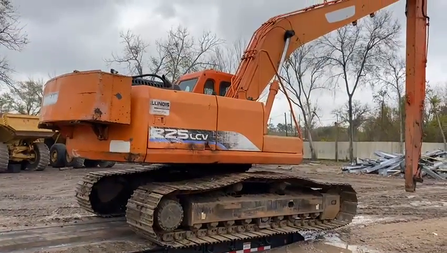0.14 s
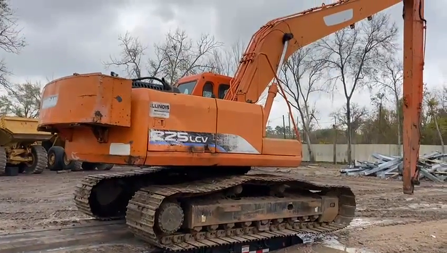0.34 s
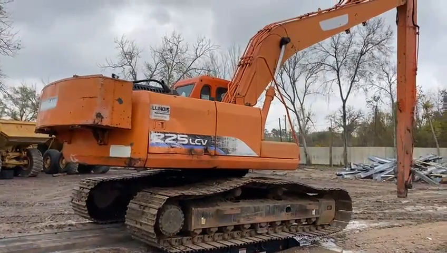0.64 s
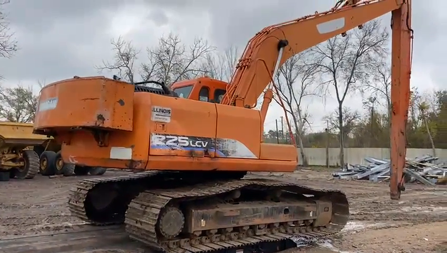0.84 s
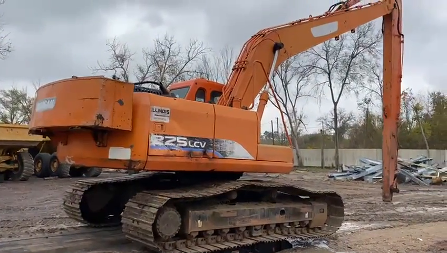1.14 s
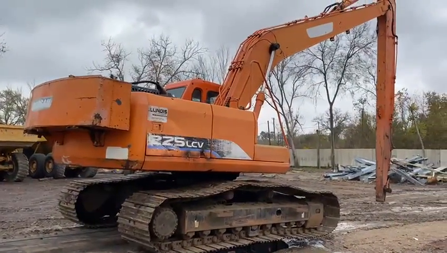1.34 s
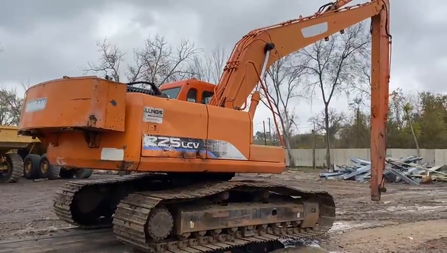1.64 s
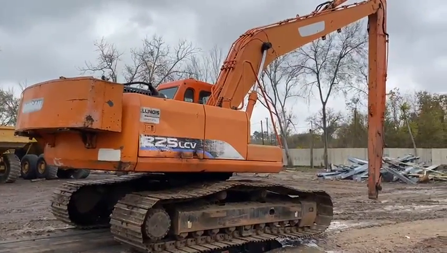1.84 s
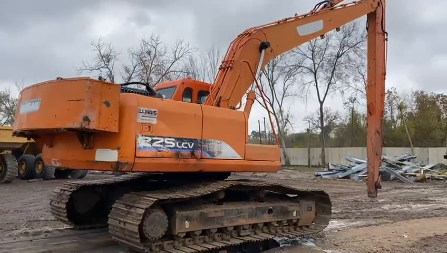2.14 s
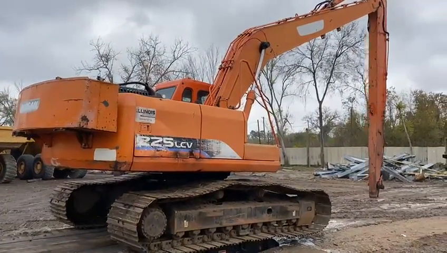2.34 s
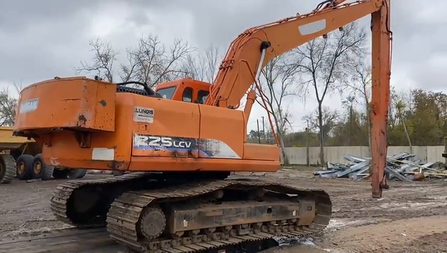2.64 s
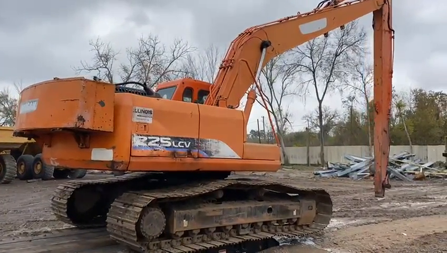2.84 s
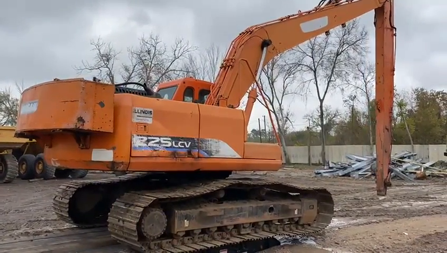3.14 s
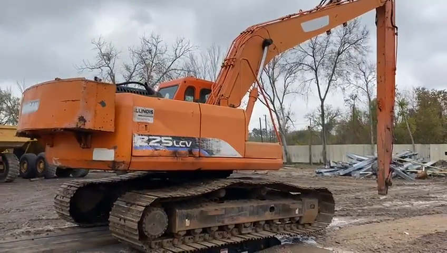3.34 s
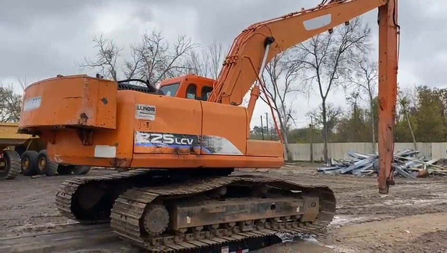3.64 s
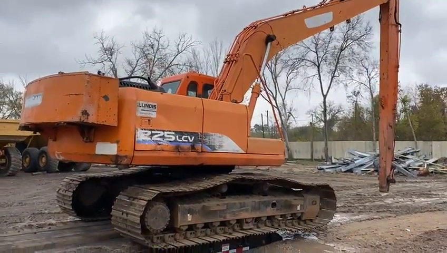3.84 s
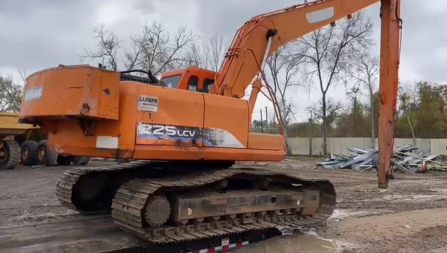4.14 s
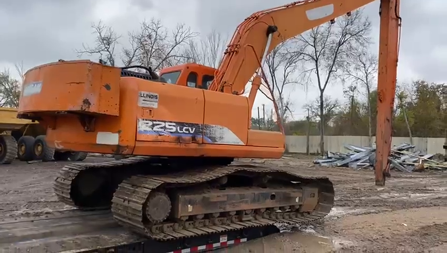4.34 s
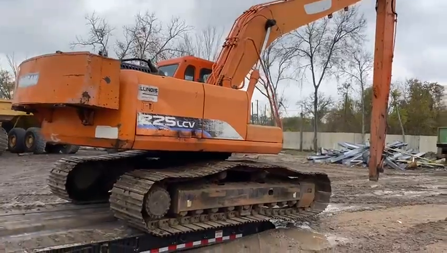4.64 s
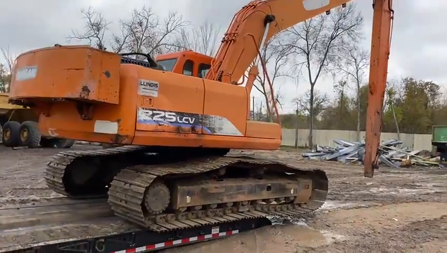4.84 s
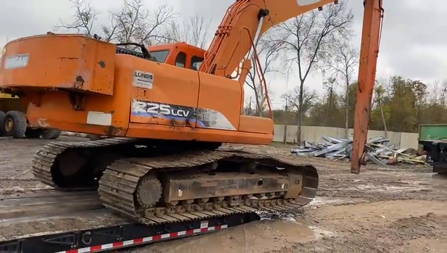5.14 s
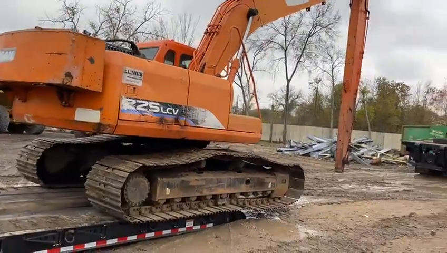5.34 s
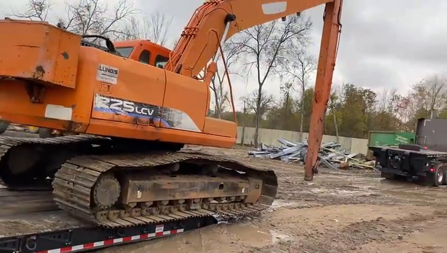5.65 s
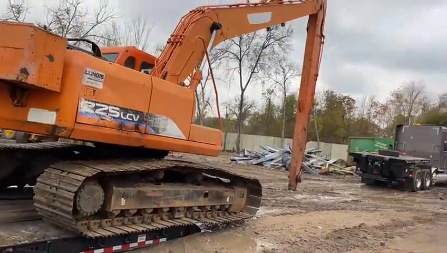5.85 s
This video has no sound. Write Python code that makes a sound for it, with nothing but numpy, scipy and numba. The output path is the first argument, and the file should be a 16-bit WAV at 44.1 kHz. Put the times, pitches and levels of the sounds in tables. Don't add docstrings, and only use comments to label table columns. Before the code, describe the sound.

In an open yard, a diesel excavator drones with a throbbing exhaust and fan roar, a truck idling low beneath it. Early on, steel track shoes clank in a loud cluster, booming through a trailer. A thin roller squeal follows, then one sharp clank. After a calmer stretch, looser clanks and scrapes return as the engine works harder. Stereo, heard from some metres away.

```python
import sys
import numpy as np
from numba import njit
from scipy import signal
from scipy.fft import rfft, irfft, next_fast_len
from scipy.io import wavfile
from scipy.ndimage import uniform_filter1d, minimum_filter1d

SR = 44100
rng = np.random.default_rng(int(sys.argv[2]) if len(sys.argv) > 2 else 0)


def put_to_file(sound):
    columns = np.atleast_2d(sound).T
    safe = np.clip(columns, -1, 1)
    whole_steps = np.round(safe * 32767)
    wavfile.write(sys.argv[1], SR, whole_steps.astype(np.int16))


def level_to_linear(level):
    exponent = np.asarray(level, float) / 20
    return 10 ** exponent


N = 265021
T = np.arange(N) / SR
START_TURN = 0.3034

# f/Hz, level/dB, wander/Hz
TRUCK_TONES = [(40.5, -64, 0.37), (62.95, -34.5, 1.45), (79.9, -36, 0.557)]
# multiple of shaft rate, level/dB
ENGINE_ORDERS = [(2, -64), (3, -39), (4, -33), (4.5, -43), (5, -30), (5.5, -45), (6, -42), (7, -49),
                 (8, -40.5), (9, -58), (11, -42.5), (12, -35), (13, -41.5), (14, -67), (15, -47.5),
                 (16, -50), (17, -49.5), (19, -54.5), (24, -46.5)]
# t/s, shaft rate/(turns per s)
SHAFT_SPEED = [(0, 23.8), (2.8, 22.7), (3.6, 23.44), (6.01, 22.75)]
# t/s, engine load level/dB, track drag level/dB
EFFORT = [(0.0, 0, -3), (0.4, -1, 1), (1.3, 2.5, -3), (1.75, 0.5, 1.5), (2.25, -.5, 1), (2.75, -2, 3),
          (3.15, 0, 2), (3.5, -0.5, 0), (3.9, -0.5, -1), (4.25, 1.5, 2), (4.5, 1.5, 2.5), (4.85, 3, 2),
          (5.15, 4.5, 3), (5.45, 5, 2.5), (5.7, 6, 2), (6.01, 6, 1)]
# f/Hz, level/dB per Hz
ROAR_COLOUR = [(15, -16), (25, -16), (53, -7), (92, -1), (126, 0), (225, -8), (279, -9), (511, -16.5),
               (562, -17.5), (699, -19), (1130, -20.5), (2070, -31.5), (4820, -37.5), (8000, -44.5),
               (10400, -46), (17600, -120)]
# f/Hz, level/dB per Hz
ROAR_TREBLE = [(9000, -41.5), (11500, -50.5), (12500, -81)]
# start t/s, end t/s, f/Hz, level/dB
ROLLER_SQUEALS = [(1.62, 2.88, 1134, -41.5), (2.9, 3.45, 1124, -51), (2.3, 2.86, 1872, -53),
                  (2.92, 3.26, 1868, -47.5), (1.76, 2.02, 3010, -56), (1.94, 2.2, 2985, -53),
                  (2.1, 2.46, 2975, -49.5), (2.56, 2.87, 2975, -48), (1.85, 2.76, 3385, -55.5),
                  (4.2, 4.56, 1098, -47), (4.2, 4.34, 1868, -50), (4.22, 4.39, 2955, -47),
                  (4.3, 4.55, 3315, -56)]
# t/s, peak level/dB, lowest f/Hz, highest f/Hz, t60/s
SHOE_RATTLES = [(0.721, -26, 2500, 4800, 0.13), (.734, -35, 4500, 8000, .06), (.747, -29, 3000, 8000, .05),
                (.797, -18.5, 1490, 4200, 0.2), (0.813, -34, 2200, 4250, 0.12),
                (0.846, -30, 800, 2600, 0.28), (.886, -28, 3500, 8000, 0.067),
                (.914, -36, 3000, 8000, 0.063), (1.136, -25, 600, 1700, 0.17),
                (1.165, -42, 500, 2140, 0.23), (1.216, -21.5, 500, 1490, 0.14),
                (1.237, -30, 696, 1590, 0.17), (1.316, -40, 600, 2200, 0.086),
                (1.347, -36, 1800, 3600, 0.074), (1.378, -28, 1680, 3400, 0.045),
                (1.419, -24.5, 500, 1760, 0.07), (1.44, -38, 2200, 3320, 0.087),
                (2.846, -16, 600, 1420, 0.23), (2.851, -28, 1500, 6000, 0.2), (2.885, -27, 600, 2160, 0.21),
                (4.7, -23.5, 1200, 4870, 0.18), (5.048, -25.5, 600, 2500, .1),
                (5.087, -27, 800, 3000, 0.066), (5.284, -27, 500, 3500, 0.32),
                (5.312, -25, 500, 1100, 0.45), (5.355, -30.5, 3000, 6000, 0.23),
                (5.375, -30, 504, 1290, 0.36), (5.377, -32, 4800, 7800, 0.14), (5.616, -28, 600, 1470, .15),
                (5.655, -30, 400, 1300, .15), (5.742, -18.5, 600, 820, .25), (5.79, -26, 400, 1000, 0.17),
                (5.858, -28.5, 490, 1600, 0.17), (5.879, -33, 1500, 3000, .08), (.724, -16, 700, 1300, .12),
                (.738, -16, 1000, 2500, .15), (.728, -8, 120, 300, .25), (5.36, -27, 700, 2300, .15),
                (.31, -28, 400, 900, .15)]
# t/s, peak level/dB, lowest f/Hz, highest f/Hz, t60/s
ROUGH_MODES = [(1.218, -40, 1980, 2120, .35), (1.135, -32, 1870, 2300, 0.18), (1.125, -26, 1280, 1520, .3),
               (1.11, -38, 2560, 2740, 0.23), (.85, -39, 4050, 4300, .17), (.846, -33, 3300, 3550, 0.15),
               (.852, -29, 1900, 2300, 0.21), (.638, -35, 1950, 2220, .15),
               (4.702, -23.5, 1900, 2500, 0.13), (5.26, -27, 4600, 5400, .06),
               (5.272, -24, 4500, 4700, 0.069), (5.315, -33.5, 1980, 2400, .3),
               (5.762, -27, 900, 1400, .15)]
# t/s, snap level/dB, drag level/dB, drag length/s
EDGE_SNAPS = [(0.8, -35, -45, 0.087), (1.084, -37, -55, .05), (1.21, -32, -35, 0.06),
              (1.418, -36, -63, .03), (2.843, -15.5, -30.5, 0.065), (4.57, -40, -60, .03),
              (4.72, -41, -54, .05), (5.05, -35, -60, .03), (5.255, -25, -50, .02),
              (5.271, -14.5, -34.5, .15), (0.725, -36, -42, 0.14), (5.745, -38, -49, 0.044),
              (4.691, -37, -55, 0.041)]
# t/s, peak level/dB, f/Hz, t60/s
FRAME_BOOMS = [(0.407, -13, 111, 0.06), (0.657, -13, 102.5, 0.56), (0.721, -4.5, 298.6, 0.2),
               (0.729, -9.5, 193, 0.36), (0.745, 3, 129, 0.11), (0.802, -3, 111, 0.24),
               (0.958, -10.5, 85.5, 0.34), (1.009, -7.5, 106.6, 0.33), (1.049, -6, 107, 0.28),
               (1.098, 3.5, 72.4, 0.046), (1.349, -18, 110, 0.65), (2.84, -15, 111, 0.12),
               (2.865, -11, 221.3, 0.53), (3.659, -23, 117, 0.29), (3.91, -19, 113, 0.12),
               (4.256, -20.5, 108, 0.32), (4.302, -13.5, 109, 0.38), (5.058, -13, 99, 0.35),
               (5.13, -10.5, 72.4, 0.19), (5.259, -11.5, 94.2, 0.49), (5.38, -15, 92, 0.66),
               (5.407, -12.5, 106.2, 0.35), (5.629, -9.5, 94.4, 0.2), (5.689, -15, 191, 0.11),
               (5.737, -9.5, 157.5, 0.26), (5.799, -14.5, 111.3, 0.7), (5.879, -12, 121, 0.4),
               (5.917, -36, 100, 0.4)]
# f/Hz, level/dB, t60/s
FRONT_MODES = [(356.5, 2.5, 0.75), (690, -12, 0.48), (873, -1, 0.41), (1255, -5, 5.0), (1427, -9, 2.6),
               (1840, -5.5, 0.45), (2086, -7, 0.33), (2270, -9, 0.32), (2606, -19, 5.0), (2853, -30, 5.0),
               (3030, -29, 5.0), (4110, -11, 0.27)]
# f/Hz, level/dB, t60/s
RAMP_MODES = [(680, -10, 0.89), (1270, -17, 0.14), (1940, -6, 5.0), (2600, -31, 5.0), (2980, -10, 0.15),
              (3400, 1, 0.09), (3930, -19, 0.1), (4120, 0, 0.049)]
# f/Hz, level/dB, t60/s
SIDE_MODES = [(360, 3, 0.039), (672, -6, 0.27), (716, -13, 0.16), (880, -28, 0.11), (954, -19, 0.24),
              (1165, -17, 0.12), (1300, -25, 0.19), (1360, -15, 0.36), (1670, -20, 0.98), (1870, -36, 5.0),
              (2170, -15, 0.11), (2680, -23, 0.14), (3521, -42, 0.22)]
# f/Hz, level/dB, t60/s
MIDDLE_MODES = [(488, -9, 0.31), (659, 6.5, 0.14), (854, -3, 0.22), (948, -10, 5.0), (1100, -19, 1.8),
                (1226, -13, 1.1), (1360, -21, 0.36), (2080, -16, 0.37), (2430, -22, 0.34),
                (3230, -32, 0.41), (3740, -13, 0.21), (4430, -35, 0.74)]
# f/Hz, level/dB, t60/s
TAIL_MODES = [(710, -3.5, 0.14), (1790, -10, 0.31), (2240, -16, 0.13), (2347, -19, 0.22),
              (2950, -6.5, 0.13), (3210, -11, 0.2), (3655, -12, 0.19), (4750, -20, 5.0), (5100, -5, 0.099),
              (5660, -14, 0.054)]
# f/Hz, level/dB, t60/s
LIP_MODES = [(815, -5, 0.66), (2000, -1, 0.032), (2290, -14, 0.084), (3480, -17, 0.29), (3747, -23, 0.38),
             (4140, -19, 0.36), (4460, -15, 0.19), (5240, -15, 0.2), (5100, -17, 0.18), (6000, -31, 0.17)]
# f/Hz, level/dB, t60/s
BEAM_MODES = [(433, -18, 0.1), (592, -3, 0.11), (792, -9, 0.18), (1137, -15, 1.0), (1250, -7.5, 0.064),
              (1460, -19, 0.15)]
DECK_PLATES = [FRONT_MODES, RAMP_MODES, SIDE_MODES, MIDDLE_MODES, TAIL_MODES, LIP_MODES, BEAM_MODES]
# t/s, level/dB, longest t60/s
PLATE_BLOWS = [
    (.721, -18, 0.37),
    (.799, -22.5, .3),
    (1.099, -9, 0.3),
    (2.845, -21, 0.34),
    (5.272, -20, 0.23),
    (5.356, -20.5, 0.25),
    (5.609, -16, 0.12),
]
# f/Hz, level/dB, t60/s
SHOE_MODES = [(363, -3, 0.22), (456, -22, 0.097), (671, -5, 0.069), (851, -3.5, 0.26), (933, -4, 0.065),
              (1020, -26, 1.3), (1190, -28, 0.07), (1380, -20.5, 0.46), (2033, -11, 0.088),
              (2275, -22, 0.2), (2570, -55, 0.084)]
# t/s, body peak level/dB, treble level against body/dB, strongest f/Hz, t60/s
SHOE_CLANKS = [(0.636, -19, -31, 570, 0.31), (0.721, -6.5, -25, 870, 0.14), (0.735, -8.5, -17, 1028, 0.25),
               (0.750, -11.5, -17, 753, 0.1), (0.769, -15, -15, 750, 0.19),
               (0.799, -14, -10.5, 1180, 0.066), (0.816, -9.5, -18, 698, 0.15),
               (0.852, -17.5, -20, 800, 0.18), (0.884, -27, -17, 697, 0.13),
               (1.098, -3.5, -22.5, 690, 0.083), (1.213, -20, -20, 592, 0.13), (1.345, -26, -17, 716, 0.26),
               (1.418, -25, -23, 432, 0.095), (2.844, -26.5, 1.5, 1014, 0.18), (2.847, -8, -26, 702, 0.096),
               (4.263, -33.5, -8, 403, 0.39), (4.299, -25.5, -24, 566, 0.16),
               (4.577, -24.5, -11.5, 1110, 0.13), (4.694, -19.5, -9.5, 1237, 0.19),
               (4.704, -15.5, -14, 1153, 0.12), (4.868, -27, -13, 1233, 0.14),
               (5.045, -20.5, -36, 505, 0.29), (5.089, -23, -20, 880, 0.19), (5.261, -16, -14, 928, 0.085),
               (5.272, -17, -11.5, 680, 0.1), (5.316, -14.5, -34, 723, 0.19), (5.354, -28.5, -5, 413, 0.18),
               (5.379, -17, -32, 810, 0.1), (5.617, -17.5, -33, 560, 0.1), (5.644, -15.5, -35, 605, 0.13),
               (5.743, -18, -23, 680, 0.16), (5.856, -23, -22, 425, 0.34)]
# t/s, f/Hz, peak level/dB, t60/s
PIN_PINGS = [(.638, 2100, -39, .12), (5.609, 440, -14, .17), (5.643, 450, -19, .18), (.787, 7375, -38, .33),
             (.85, 7375, -44, .12), (.8, 4200, -33, .15), (.84, 3450, -42, .2), (1.099, 945, -16, .12),
             (1.136, 760, -18, .12), (2.846, 1050, -15, .1), (2.846, 740, -15, .12), (.812, 340, -18, .15),
             (4.576, 1150, -25, .07), (4.577, 3050, -35, .07), (4.616, 1200, -32, .08),
             (4.617, 3000, -42, .05), (4.705, 1180, -25, .11), (2.846, 1880, -26, .1), (.81, 8150, -46, .3),
             (2.735, 7750, -54, .12), (4.577, 1830, -29, .06), (4.706, 1860, -26, .12),
             (5.36, 7200, -46, .2), (5.272, 3100, -33, .1), (5.75, 2200, -34, .12), (5.745, 1590, -33, .08)]
# f/Hz, sum level/dB, difference level/dB, lean to the left/0-1
PORT_RESPONSE = [(60, -1.5, -26, 0.05), (200, -0.5, -15, 0), (590, 0, -3.5, 0), (1190, 0.5, -3.5, 0),
                 (2020, 1.5, 2, 0.1), (3000, 1.5, -3, 0.28), (6300, -2, -7, 0.05)]
# f/Hz, sum level/dB, difference level/dB, lean to the left/0-1
TREBLE_GAPS = [(6200, 0, -6, .05), (6500, 0, -50, 0), (7450, 0, -50, 0), (7800, 0, -5, 0), (8200, -3, -2, 0),
               (8450, -50, 0, 0), (9550, -50, 0, 0), (9850, -9, -1, 0), (10200, -2, -3, 0),
               (10600, 0, -50, 0), (11700, 0, -50, 0), (12100, -40, -70, 0)]
NOTCH_LEAKS = [1.105, 2.846, 5.26, 5.28]


def shape(x, hz, db):
    size = next_fast_len(x.shape[-1])
    f = np.log(np.arange(size // 2 + 1) * SR / size + 1)
    gain = level_to_linear(np.interp(f, np.log(hz), db))
    return irfft(rfft(x, size) * gain, size)[..., :x.shape[-1]]


def band(x, lo_hz, hi_hz):
    return signal.sosfilt(signal.butter(2, [lo_hz, hi_hz], "bandpass", fs=SR, output="sos"), x)


def walk(rate):
    hold = int(SR / rate / 64)
    steps = np.arange(N // 64 + 2)
    held = rng.standard_normal(512)[steps // hold % 512]
    slewed = uniform_filter1d(uniform_filter1d(held, hold), hold)
    return np.interp(T, steps * 64 / SR, 1.3 * slewed)


def grains(count, length):
    return np.repeat(rng.standard_normal(count // length + 1), length)[:count]


def rise(t, seconds):
    return 1 - np.exp(-t / seconds)


def fall(t, t60):
    return np.exp(-np.log(1000) * t / t60)


def tone(hz, db, turn):
    phase = 2j * np.pi * (np.cumsum(hz) / SR + turn)
    z = np.sqrt(2) * np.exp(phase + db * np.log(10) / 20)
    return np.array([z.imag, z.real])


def add(out, x, s):
    i = int(s * SR)
    out[:, i:i + x.shape[1]] += x[:, :N - i]


def set_side(x, side_db):
    return x * np.array([[1], [level_to_linear(side_db)]])


@njit(fastmath=True)
def ring(x, hz, gain, decay):
    out = np.zeros(x.shape)
    for k in range(len(hz)):
        pole = np.exp((2j * np.pi * hz[k] - decay[k]) / SR)
        for c in range(2):
            z = 0j
            for i in range(x.shape[1]):
                z = z * pole + x[c, i]
                out[c, i] += gain[k] * z.imag
    return out


def yard_echo(hits):
    level_db, t60_s, first_echo_s = -12.5, 0.48, .015
    t = T[:SR // 2]
    tail = rng.standard_normal((2, len(t))) * fall(t, t60_s) * (t > first_echo_s)
    tail = tail * level_to_linear(level_db) / np.linalg.norm(tail[0])
    return signal.fftconvolve(hits[:1], tail, axes=1)[:, :N]


def idling_truck():
    out = np.zeros((2, N))
    for hz, db, wander_hz in TRUCK_TONES:
        out += tone(hz + wander_hz * walk(2.028), db + 2.6 * walk(2.64), rng.random())
    return out


def roar(shaft, rumble_db, mid_db, hiss_db):
    spacing = .75
    hz, db = np.transpose(ROAR_COLOUR[:-2] + ROAR_TREBLE)
    size = next_fast_len(N)
    octave = np.log2(np.arange(size // 2 + 1) * SR / size + 1)
    colour = level_to_linear(np.interp(octave, np.log2(hz), db))
    spectrum = rfft(rng.standard_normal((2, size))) * colour
    throb = np.cos(2 * np.pi * (np.cumsum(shaft) / SR + START_TURN - .1))
    shared = walk(4.65)
    out = np.zeros((2, N))
    for centre in np.arange(4.5, 14.3, spacing):
        window = np.clip(1 - abs(octave - centre) / spacing, 0, 1) ** .5
        part = irfft(spectrum * window, size)[:, :N]
        low, high = np.clip(8.6 - centre, 0, 1), np.clip(centre - 10.6, 0, 1)
        load = low * rumble_db + high * hiss_db + (1 - low - high) * mid_db
        out += part * level_to_linear(load + .5 * shared + 1.3 * walk(14) + .6 * throb)
    return out * level_to_linear(-6.0)


def engine(shaft, load_db):
    pipe_spread = .02
    out = np.zeros((2, N))
    for order, db in ENGINE_ORDERS:
        level_db = db + .5 * load_db + 0.97 * walk(4.19)
        turn = order * START_TURN - pipe_spread * order * order + 0.054 * walk(2.96)
        out += tone(order * shaft, level_db, turn)
    return out


def roller_squeals():
    sag_per_s = .012
    out = np.zeros((2, N))
    for start, end, first_hz, db in ROLLER_SQUEALS:
        t = T[:int((end - start) * SR)]
        tremble = (1 + .003 * walk(4) + .0035 * walk(60))[:len(t)]
        hz = first_hz * (1 - sag_per_s * t) * tremble
        ends = np.clip(np.minimum(t, t[::-1]) / .08, 0, 1)
        swell = level_to_linear(2.0 * walk(20)[:len(t)]) * ends
        add(out, tone(hz, db, 0) * swell, start)
    return out


def shoe_rattles():
    rise_s, grit_db, side_db = 0.0084, 0.5, -2.5
    out, t = np.zeros((2, N)), np.arange(SR // 5) / SR
    for s, peak_db, lo_hz, hi_hz, t60 in SHOE_RATTLES + ROUGH_MODES:
        noise = band(rng.standard_normal((2, len(t))), lo_hz, hi_hz)
        steps = np.repeat(rng.standard_normal(len(t) // 128 + 1), 128)
        grit = level_to_linear(grit_db * uniform_filter1d(steps, size=64)[:len(t)])
        ending = np.clip((t[-1] - t) / .03, 0, 1)
        envelope = rise(t, rise_s) * fall(t, np.clip(t60, .03, .5)) * ending
        add(out, noise / noise.std() * grit * envelope * level_to_linear(peak_db), s - .002)
    return set_side(out, side_db)


def edge_snaps():
    snap_s = .004
    out, t = np.zeros((2, N)), np.arange(SR // 4) / SR
    for s, snap_db, drag_db, length in EDGE_SNAPS:
        noise = rng.standard_normal((2, len(t)))
        noise = shape(noise, [300, 1500, 5000, 8000, 11500], [-11, -15, 4.5, -2.5, -6.5])
        grit = level_to_linear(3.5 * grains(len(t), 128))
        drag = level_to_linear(drag_db) * grit * np.clip((length - t) / 0.039, 0, 1)
        snap = level_to_linear(snap_db) * np.exp(-t / snap_s)
        add(out, noise * (snap + drag) * np.clip(t / .001, 0, 1), s)
    return set_side(out, 2.5)


def frame_booms():
    out, t = np.zeros((2, N)), np.arange(SR // 2) / SR
    for s, peak_db, hz, t60 in FRAME_BOOMS:
        thud = band(rng.standard_normal((2, len(t))), 111, 313)
        body = tone(hz + 0 * t, 0, 0) + 0.75 * thud / thud.std()
        envelope = rise(t, 0.0037) * fall(t, np.clip(t60, .04, 1))
        add(out, body * envelope * level_to_linear(peak_db - 7.0), s - .004)
    return out


def deck_plates():
    chatter_s, chatter_db, chatter_pitch = .012, 3, .008
    out, t = np.zeros((2, N)), np.arange(SR // 4) / SR
    knots = np.arange(0, .26, chatter_s)
    for (s, level_db, longest), modes in zip(PLATE_BLOWS, DECK_PLATES):
        for hz, db, t60 in modes:
            loud, pitch = (np.interp(t, knots, row) for row in rng.standard_normal((2, len(knots))))
            envelope = rise(t, 0.0042) * fall(t, np.clip(t60, .04, longest))
            mode_level_db = level_db + db + chatter_db * loud
            mode = tone(hz * (1 + chatter_pitch * pitch), mode_level_db, rng.random())
            add(out, mode * envelope, s)
    return set_side(out, -7.0)


def pin_pings():
    out, t = np.zeros((2, N)), np.arange(SR // 5) / SR
    for s, hz, peak_db, t60 in PIN_PINGS:
        add(out, tone(hz + 0 * t, peak_db, 0) * rise(t, 0.0017) * fall(t, t60), s)
    return set_side(out, -6.0)


def shoe_clanks():
    clack_db, clack_per_hardness = 4, 0.57
    bounce_s, bounce_db, bounce_hz = 0.032, -11.5, 2410
    out, t = np.zeros((2, N)), np.arange(SR // 5) / SR
    hz, db, t60s = np.transpose(SHOE_MODES)
    edges = np.array([350, 1400, 4000, 8000]) * 2048 // SR
    landing = np.exp(-t / .007) * rise(t, .004)
    rocking = level_to_linear(bounce_db) * np.interp(t - bounce_s, t, landing)
    for s, body_db, hard_db, own_hz, t60 in SHOE_CLANKS:
        detune, strike = rng.standard_normal((2, len(SHOE_MODES)))
        place, size, damping = rng.random((3, 38))
        noise = rng.standard_normal((2, 2, len(t)))
        contacts = level_to_linear(2.5 * grains(len(t), 100))

        decay_rate = np.log(1000) / np.clip(t60, .03, 1)
        mode_hz = np.r_[hz * (1 + .02 * detune), own_hz, 400 * 28 ** place]
        mode_db = np.r_[db + 3.0 * strike, 1.5, -7 - 20 * place - 7 * size]
        deck_damping = .55 + .9 * damping + 3 * place ** 2
        decay = decay_rate * np.r_[.2 / np.clip(t60s, .1, .35), 1.1, deck_damping]
        rattle = contacts * (noise[0] * landing + band(noise[0], 340, bounce_hz) * rocking)
        rung = ring(rattle, mode_hz, level_to_linear(mode_db), decay)

        crash = shape(noise[1], [400, 1000, 8000, 12000], [7.5, 5.5, -28.5, -39]) * contacts
        crash *= rise(t, .003) * np.exp(-decay_rate * t)
        rocked = np.roll(crash, int(bounce_s * SR), axis=1)
        crash = crash + band(rocked, 540, bounce_hz) * level_to_linear(bounce_db - 1.0)
        hit = rung / rung[:, :1024].std() + level_to_linear(-1.5) * crash / crash[:, :1024].std()

        spectrum = np.mean(abs(rfft(hit[:, :2048])) ** 2, axis=0)
        power = np.add.reduceat(spectrum, edges)[:3] / 2 ** 20
        wanted_db = body_db + np.array([0, clack_db + clack_per_hardness * hard_db, hard_db])
        body, clack, tick = wanted_db - 10 * np.log10(power) - 7.0
        tilt_db = [body - 20, body - 4.0, body, body, clack, tick]
        add(out, shape(hit, [150, 350, 600, 900, 2200, 5200], tilt_db), s - .003)
    return set_side(out, -6.0)


def scene():
    s, *columns = np.transpose(EFFORT)
    rumble_db, drag_db = (np.interp(T, s, column) for column in columns)
    mid_db = 0.58 * rumble_db + 0.41 * drag_db
    hiss_db = 0.57 * rumble_db + drag_db
    shaft = np.interp(T, *np.transpose(SHAFT_SPEED)) * (1 + 0.00095 * walk(1.515))
    hits = shoe_clanks() + pin_pings() + frame_booms()
    background = idling_truck() + yard_echo(hits)
    machine = roar(shaft, rumble_db, mid_db, hiss_db) + engine(shaft, rumble_db)
    steel = roller_squeals() + shoe_rattles() + edge_snaps() + deck_plates()
    return background + machine + steel + hits


def band_limit(x):
    return signal.sosfilt(signal.butter(12, 12580, fs=SR, output="sos"), x)


def record(dry):
    leak_db, leak_s = -12, .018
    hz, sum_db, difference_db, lean = np.transpose(PORT_RESPONSE + TREBLE_GAPS)
    peak = -minimum_filter1d(-abs(dry[0]) - .5 * abs(dry[1]), size=220)
    ahead, aside = dry * uniform_filter1d(np.clip(.92 / peak, 0, 1), size=220)
    mid = shape(ahead, hz, sum_db)
    opening = sum(np.clip(2 - 2 * abs(T - s) / leak_s, 0, 1) for s in NOTCH_LEAKS)
    leak = shape(ahead, [8200, 8450, 9700, 10100], [-80, 0, 0, -80])
    mid = mid + level_to_linear(leak_db) * np.clip(opening, 0, 1) * leak
    lean_db = 20 * np.log10(np.clip(lean, 1e-4, .9))
    side = shape(aside, hz, difference_db) + shape(mid, hz, lean_db)
    return band_limit(np.array([mid + side, mid - side]))


dry = scene()
out = record(dry)
put_to_file(out)
```